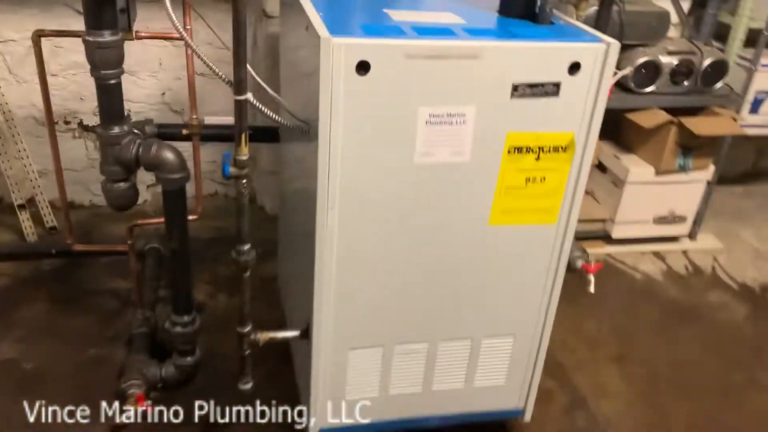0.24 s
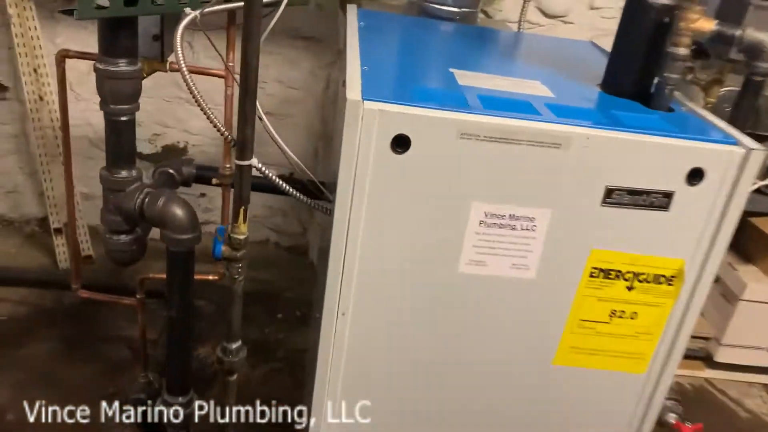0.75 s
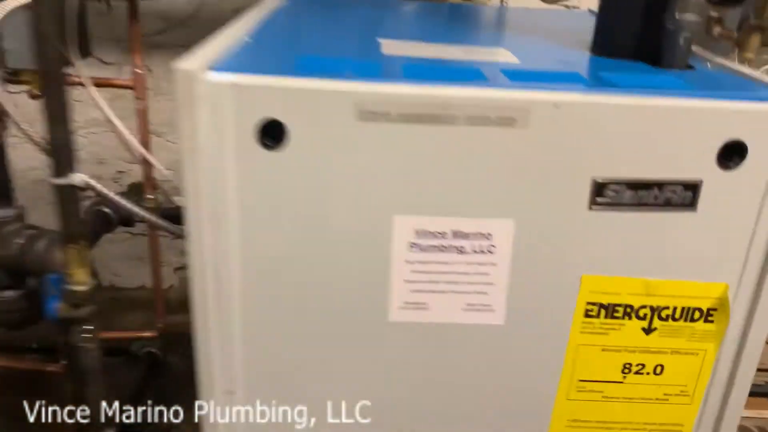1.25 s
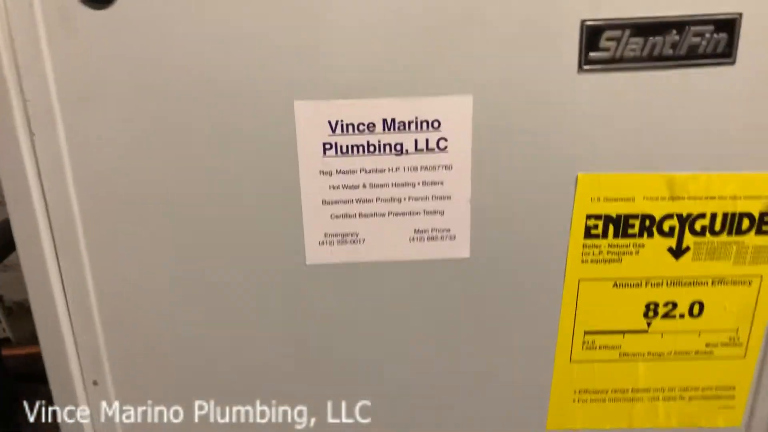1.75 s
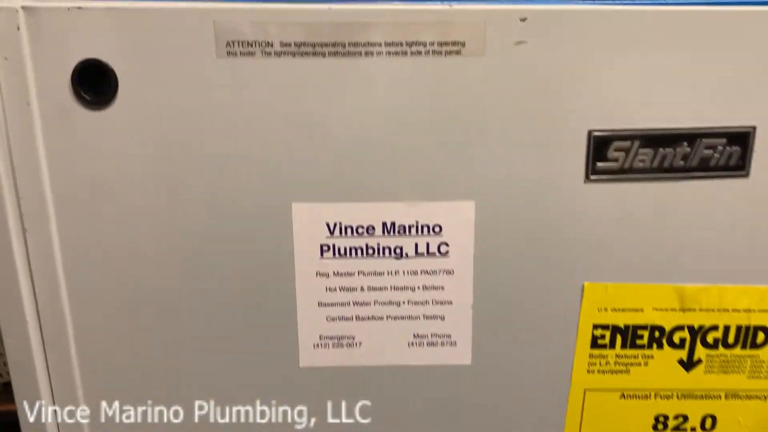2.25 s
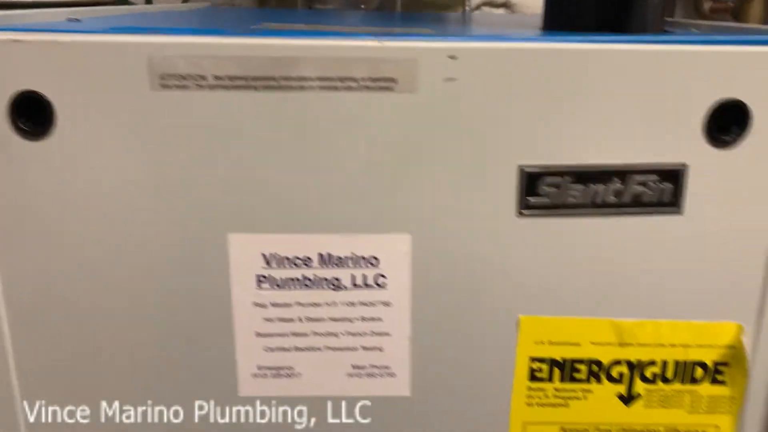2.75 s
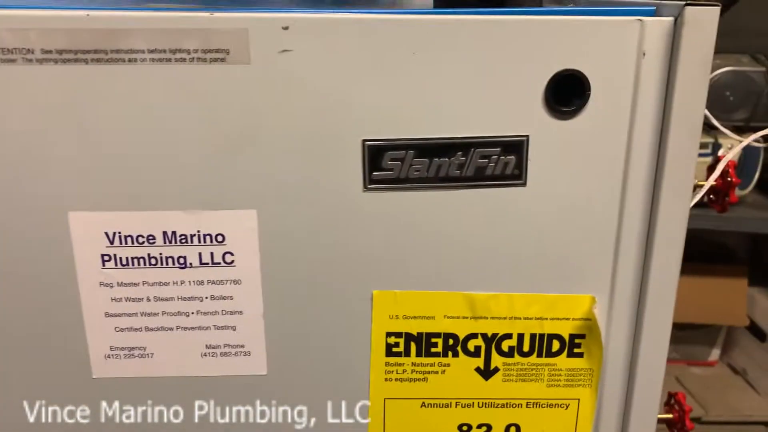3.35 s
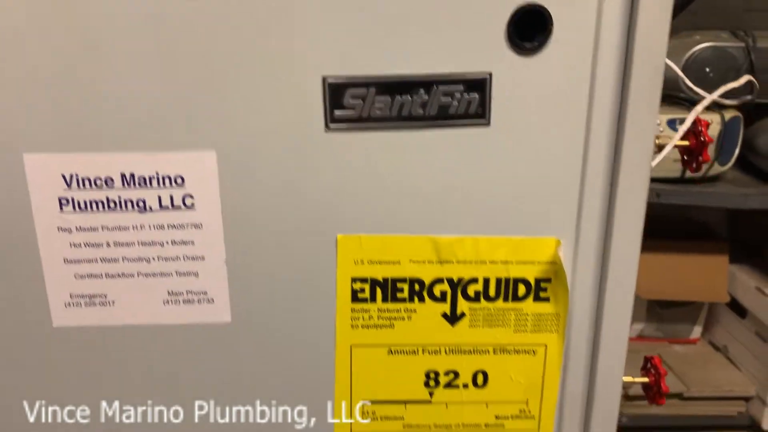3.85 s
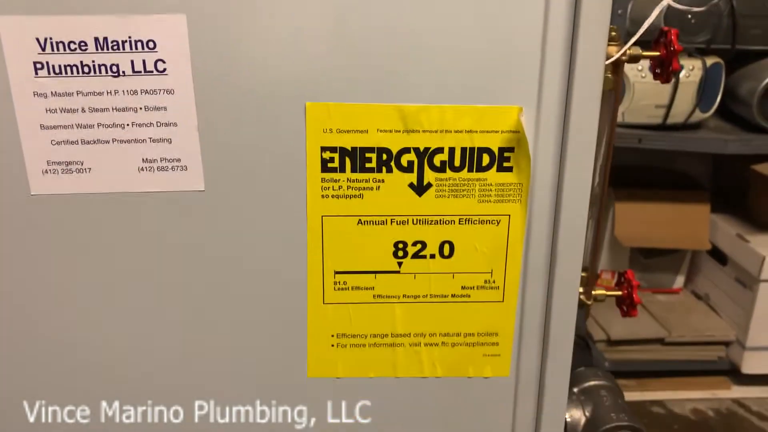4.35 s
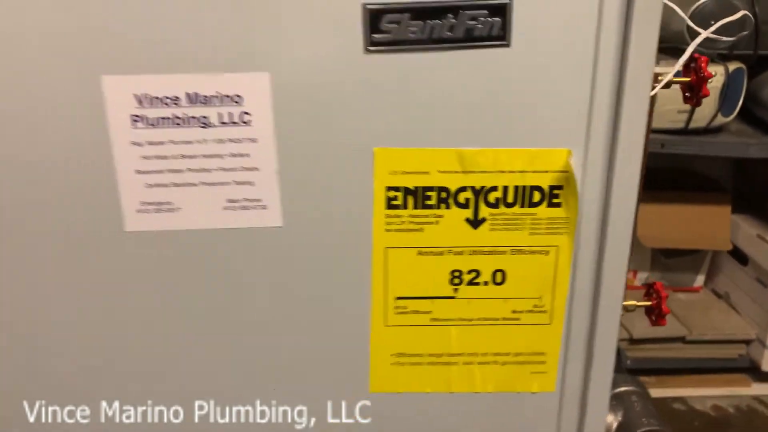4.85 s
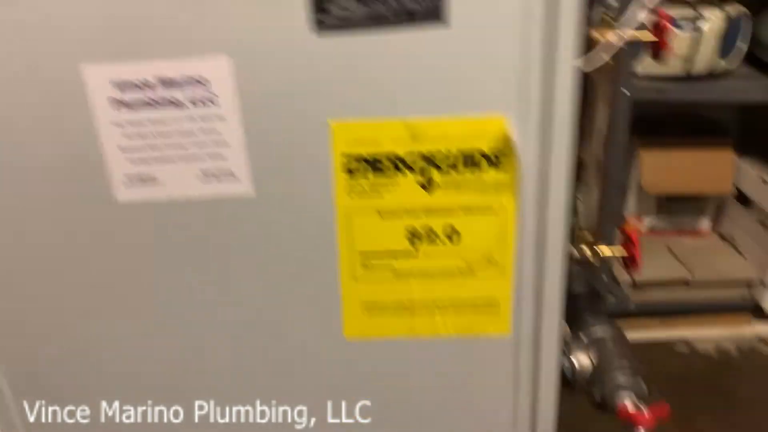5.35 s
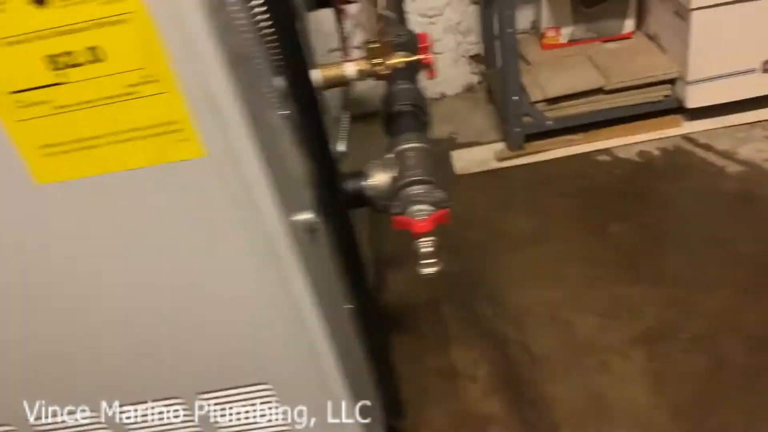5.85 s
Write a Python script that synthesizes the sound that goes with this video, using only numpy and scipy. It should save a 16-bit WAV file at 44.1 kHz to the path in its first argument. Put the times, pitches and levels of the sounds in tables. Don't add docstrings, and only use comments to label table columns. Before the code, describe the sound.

In a concrete basement a gas boiler burns continuously: a deep, slightly wavering rumble, soft low flutters of flame and a fine steady hiss. Close to a handheld stereo microphone someone shifts about, boots creaking in short dry bursts, a soft step scuffing at about one second, and a sharper gritty scuff with a tiny crack after five and a half seconds. Bare walls add a short echo.

```python
import sys
import numpy as np
from scipy import signal
from scipy.fft import rfft, irfft, next_fast_len
from scipy.io import wavfile
from scipy.ndimage import uniform_filter1d

SR = 44100
rng = np.random.default_rng(int(sys.argv[2]) if len(sys.argv) > 2 else 0)


def master_out(mix):
    frames = np.transpose(np.atleast_2d(mix))
    ceiling = np.clip(frames, -1, 1)
    pcm = np.round(ceiling * 32767).astype(np.int16)
    wavfile.write(sys.argv[1], SR, pcm)


def invert_db(level):
    return 10 ** (np.asarray(level, dtype=float) / 20)


N = 268657


def unit(x):
    return x / np.sqrt(np.mean(x ** 2) + 1e-20)


def along(points, hz):
    f, value = np.transpose(points)
    return np.interp(np.log(hz + 1), np.log(f + 1), value)


def curves(rows, t):
    times, *columns = np.transpose(rows)
    return [np.interp(t, times, column) for column in columns]


def filtered(x, response):
    size = next_fast_len(N + SR // 2)
    hz = np.fft.rfftfreq(size, 1 / SR)
    return irfft(rfft(x, size) * response(hz), size)[..., :N]


def modes(table):
    def response(f):
        total = 0
        for k, (centre, width, db) in enumerate(table):
            total = total + (-1) ** k * invert_db(db) * 1j * f * width / (centre ** 2 - f ** 2 + 1j * f * width)
        return total
    return response


# (frequency [Hz], likeness [0..1])
ALIKE = [(150, .995), (280, .88), (600, .5), (1300, .22), (4200, .18), (4900, .6), (7500, .7), (8800, .88),
         (9300, .98), (9900, .98), (10800, .8), (12300, .87), (12700, .995), (14200, .995), (15000, .5)]


def spread(response, gain_db=lambda hz, t: 0, patchy_db=0.):
    hz, t, z = signal.stft(rng.standard_normal((2, N)), SR, nperseg=512)
    patches = uniform_filter1d(rng.standard_normal(z.shape[1:]), size=5, axis=0)
    patches = uniform_filter1d(patches, size=16, axis=1)
    gain = invert_db(patchy_db * unit(patches) + gain_db(hz[:, None], t))
    pair = signal.istft(z * gain, SR, nperseg=512)[1][:, :N]

    def middle_and_side(f):
        turn = np.arccos(np.clip(along(ALIKE, f), 0, 1)) / 2
        return response(f) * [np.cos(turn), np.sin(turn)]
    mid, side = filtered(pair, middle_and_side)
    return unit(np.array([mid + side, mid - side]))


def steadied(x, amount):
    envelope = np.abs(signal.hilbert(x.mean(axis=0), next_fast_len(N))[:N])
    return unit(x * (envelope + 0.16) ** -amount)


# (frequency [Hz], width [Hz], level [dB])
FLAME_MODES = [(61.7, 19.4, -14), (87.9, 17.7, -4.5), (107.2, 10, 0), (126.3, 7.6, -6.5)]
# (frequency [Hz], width [Hz], level [dB])
FLUE_MODES = [(145.7, 16, 3), (159.2, 21.4, -0.5), (196.3, 18, -6), (237.3, 9.8, -7.5),
              (255.5, 17.2, -12.5), (342, 29, -15.5)]
# (frequency [Hz], width [Hz], level [dB])
CHIMNEY_MODE = [(45.5, 22, 0)]
# (frequency [Hz], level per Hz [dB])
DRAUGHT = [(180, -10.5), (300, -1.5), (372, -4.5), (641, -6), (702, -3.5), (734, -6), (1070, -1),
           (1500, -17.5), (1840, -9.5), (4500, -7), (5850, -15), (9900, -120)]
# (time [s], level [dB])
BURN = [(0.0, -33), (0.05, -43.5), (0.8, -51), (1.0, -41.5), (2.22, -44), (2.37, -35.5), (2.44, -42.5),
        (4.99, -40.5), (5.05, -49), (5.15, -35), (5.33, -40), (5.95, -42), (6.02, -44), (6.09, -33)]


def flames(t):
    burn_db = curves(BURN, t)[0]
    mean_db = burn_db.mean()
    deep = invert_db(burn_db) * steadied(spread(modes(FLAME_MODES)), 0.22)
    upper_db = -47.5 + 0.3 * (burn_db - mean_db)
    upper = invert_db(upper_db) * steadied(spread(modes(FLUE_MODES), patchy_db=0.24), 0.12)
    drone = invert_db(-53.5) * spread(lambda f: modes(CHIMNEY_MODE)(f) ** 2)

    def air_db(hz, at):
        follows_db = 0.1 * (curves(BURN, at)[0] - mean_db)
        return (-8.5 + follows_db) * np.clip((hz - 1800) / 1000, 0, 1)
    draught = invert_db(-53.0) * spread(lambda f: invert_db(along(DRAUGHT, f)), air_db, patchy_db=3.0)
    return drone + deep + upper + draught


def puffs():
    puffs_per_s, level_db = 9, -55.5
    blows = (rng.random(N) < puffs_per_s / SR) * invert_db(4.1 * rng.standard_normal(N))
    thump = modes([(135, 110, 0)])
    return invert_db(level_db) * unit(filtered(-blows, lambda f: thump(f) ** 2))


# (frequency [Hz], level per Hz [dB])
JETS = [(2500, -23), (3500, -7), (4600, -3), (5200, 1), (5900, -1), (8000, 1), (9500, 2), (11500, 2.5),
        (13000, -4), (14200, -9.5), (15600, -11), (15900, -120)]
TUBES = [3000, 3450, 3920, 4370, 4895, 5295, 5785, 6270, 6700, 7175, 7750, 8240, 8790, 9200, 9690, 10100,
         10600]
# (time [s], hiss level [dB], crest of the floor echo [Hz])
WALK = [(0, -55, 11800), (.3, -55, 11950), (.7, -54, 11650), (1.0, -53, 12000), (2.0, -53, 11100),
        (2.9, -53.5, 11400), (3.7, -53.5, 11500), (4.3, -52, 11950), (4.6, -52.5, 11600),
        (5.2, -52.5, 11600), (5.4, -52, 12300), (5.62, -50.5, 11600), (6.09, -53, 11800)]


def jets(t):
    def colour(f):
        ripple = np.cos(2 * np.pi * np.interp(f, TUBES, np.arange(len(TUBES))))
        tubes_db = 3.84 * ripple * np.clip((10500 - f) / 3000, .25, 1)
        return invert_db(along(JETS, f) + tubes_db)

    def echo_db(hz, at):
        crest_hz = curves(WALK, at)[1]
        return 2.2 * np.cos(2 * np.pi * 8 * hz / crest_hz) * np.clip((hz - 6500) / 3000, 0, 1)
    return invert_db(curves(WALK, t)[0] + 6.5) * spread(colour, echo_db, patchy_db=1.13)


# (start [s], length [s], slips [count], level [dB], upper over lower mode [dB])
CREAKS = [
    (1.238, 0.11, 9, -41.5, -4),
    (2.938, 0.18, 8, -46.5, -12),
    (4.628, .092, 8, -36, -1),
    (4.884, .1925, 12, -34, 5),
    (5.169, 0.13, 8, -41, -8.5),
]


def creaks():
    quick_gap_s, slowing = .0115, 1.55
    swell_db, peak_late, uneven_db, colour_db = 7, 1.7, 1.2, 2
    slips = []
    for start, length, count, db, bright_db in CREAKS:
        count = round(count)
        waits = slowing ** np.arange(count - 1)
        waits = quick_gap_s + waits / waits.sum() * (length - quick_gap_s * len(waits))
        times = start + np.cumsum([0, *waits])
        luck = rng.standard_normal((count, 2))
        progress = (np.arange(count) + 1) / (count + 1)
        swell = swell_db * (np.sin(np.pi * progress ** peak_late) - 1)
        slips += zip(times, db + swell + uneven_db * luck[:, 0], bright_db + colour_db * luck[:, 1])
    return slips


# (start [s], hold [s], level [dB], upper mode [dB], top mode [dB])
STROKES = [(0, 0.013, -44.5, -4, -4), (0.05, 0.17, -59.5, -16, -3), (0.247, 0.031, -52, -13, -3.5),
           (0.302, 0.17, -54, -6, -8), (0.546, 0.043, -54, 5, -5), (0.595, 0.12, -54, 0, -8),
           (0.783, 0.043, -55.5, -7, -23), (0.996, 0.15, -55.5, -1, -12), (1.228, 0.092, -48, -1.5, -13),
           (1.327, 0.2, -55, -9, -9), (2.213, 0.19, -60.5, 0, -11), (2.745, 0.42, -64.5, 1.5, -1.5),
           (3.379, 0.11, -54, -11, -17), (1.575, .55, -64, -6.5, -8), (3.543, 1, -65.5, -8, -6.5),
           (4.61, 0.16, -58.5, -5, -5.5), (4.88, 0.11, -56, -7, -4), (5.003, 0.17, -56.5, -16, -2.5),
           (5.154, 0.11, -56.5, -7, -10), (5.417, 0.29, -55, -6, -8.5), (5.733, .4, -52, -9, -12)]


def rubbing(t):
    rise_s, t60_s = 0.011, 0.25
    power = np.zeros((3, N))
    for start, hold, db, upper_db, top_db in STROKES:
        rise = np.clip((t - start) / rise_s, 0, 1)
        fall = invert_db(-60 * np.clip(t - start - hold, 0, None) / t60_s)
        power += (invert_db([[db], [db + upper_db], [db + top_db]]) * rise * fall) ** 2
    return np.sqrt(power)


# (time [s], level [dB], upper over lower mode [dB])
SLIPS = [(.005, -35.5, 7), (.26, -36, -7), (.277, -48, -17), (.323, -54, 4), (.394, -44.5, 11),
         (.437, -48, -1), (.557, -42, -4), (1.021, -49, 0), (1.398, -40, 0), (1.432, -36.5, -2),
         (1.478, -33, -0.5), (2.22, -42, 7), (2.313, -38, -5), (2.372, -39, -3), (2.895, -43.5, -6),
         (3.36, -38.5, -12), (3.396, -44, -7), (3.03, -49, -12), (4.353, -43.5, 1), (4.61, -33, -5),
         (4.747, -37.5, -3), (5.146, -35, -12), (5.347, -47.5, 14), (5.389, -52.5, 19), (5.44, -49, 13),
         (5.694, -41, -2), (5.76, -48, -5), (5.841, -40, 2), (6.004, -47, -24), (6.017, -39, -1)]
# (frequency [Hz], width [Hz])
LEATHER = [(620, 250), (1110, 290), (1750, 800)]
# (time [s], pitch [ratio])
BEND = [
    (0, 0.97),
    (.7, 0.98),
    (1.22, 0.88),
    (1.34, 0.9),
    (1.42, 0.98),
    (3.2, 1.105),
    (3.36, 1.17),
    (3.6, 0.95),
    (4.9, 1.005),
    (6.09, 0.93),
]


def leather(t):
    out = np.zeros(N + 2048)
    grid = np.fft.rfftfreq(2048, 1 / SR)
    for s, db, bright_db in SLIPS + creaks():
        bend = curves(BEND, s)[0]
        kicks = invert_db([db - bright_db / 2 + 36.5, db + bright_db / 2 + 37.5, db + bright_db / 2 + 14])
        spectrum = 0
        for kick, (hz, width), lag_s in zip(kicks, LEATHER, [.002, 0, 0]):
            mode = modes([(bend * hz, 1.15 * width, 0)])(grid)
            spectrum = spectrum + kick * mode ** 3 * np.exp(-2j * np.pi * grid * lag_s)
        ring = irfft(spectrum)
        out[round(s * SR):][:len(ring)] += ring
    out = out[:N]

    slack, taut = .85, 1.15
    tautness = np.clip((curves(BEND, t)[0] - slack) / (taut - slack), 0, 1)
    for (hz, width), rub, share in zip(LEATHER, rubbing(t), invert_db([-0.5, 0.9, 3.5])):
        crowd = (rng.random(N) < 650 / SR) * invert_db(4.8 * rng.standard_normal(N))
        crowd = crowd * rng.choice([-1, 1], N)
        loose, tight = [filtered(crowd, lambda f: modes([(ratio * hz, 1.2 * width, 0)])(f) ** 2)
                        for ratio in (slack, taut)]
        out += share * rub * unit(np.sqrt(1 - tautness) * loose + np.sqrt(tautness) * tight)
    return out


# (start [s], rise [s], t60 [s], level [dB], centre [Hz])
SCUFFS = [
    (0, 0.059, 0.22, -51, 6640),
    (1.005, 0.01, 0.12, -53, 2190),
    (1.084, 0.018, 0.16, -44.5, 1590),
    (1.094, 0.016, 0.18, -44.5, 5160),
    (5.54, 0.025, 0.14, -48, 4670),
    (5.61, 0.0091, 0.079, -43.5, 5230),
    (5.745, 0.017, .2, -50, 9000),
]


def soles(t):
    out = np.zeros(N)
    for start, rise, t60, db, hz in SCUFFS:
        since = np.clip(t - start, 0, None)
        stroke = np.where(since < rise, (since / rise) ** 1.4, invert_db(-60 * (since - rise) / t60))
        grit = rng.standard_normal(N) * invert_db(0.7 * rng.standard_normal(N))
        out += invert_db(db) * stroke * unit(filtered(grit, lambda f: modes([(hz, 1.25 * hz, 0)])(f) ** 2))
    return out


# (time [s], peak level [dB], frequency [Hz])
GRIT = [
    (4.468, -37, 7280),
    (5.551, -40, 6100),
    (5.567, -54, 7080),
    (5.58, -46, 6270),
    (5.6226, -29, 5930),
    (5.7633, -53, 5900),
]


def snaps():
    out = np.zeros(N)
    u = np.arange(SR // 100) / SR
    for s, db, hz in GRIT:
        tick = invert_db(-60 * u / .0012) * np.sin(2 * np.pi * hz * u)
        noise = np.pad(rng.standard_normal(len(u)), (0, N - len(u)))
        ring = .3 * invert_db(-60 * u / .008) * filtered(noise, modes([(hz, hz, 0)]))[:len(u)]
        out[round(s * SR):][:len(u)] += invert_db(db + 7) * (tick + ring)
    return out


# (frequency [Hz], t60 [s])
CELLAR = [(200, 0.66), (1000, 0.21), (4000, 0.21), (7500, 0.14), (9000, 0.015), (12000, 0.0069)]


def cellar(x):
    hz, t, z = signal.stft(rng.standard_normal((2, SR // 2)), SR, nperseg=256)
    decay = invert_db(-60 * t / along(CELLAR, hz)[:, None])
    tail = signal.istft(z * decay, SR, nperseg=256)[1]
    delayed = np.pad(x, (150, 0))[None]
    return signal.fftconvolve(delayed, tail / np.linalg.norm(tail[0]), axes=1)[:, :N]


def scene():
    t = np.arange(N) / SR
    creak = leather(t)
    scuff = soles(t)
    creak = creak + snaps()
    creak = creak + invert_db(-7.5) * cellar(creak)
    scuff = 0.74 * scuff + invert_db(4.0) * cellar(scuff)
    return flames(t) + puffs() + jets(t) + creak + scuff


# (frequency [Hz], lead [rad])
LEAD = [(0, 0), (250, .1), (600, .5), (1500, .7), (1900, -1.9), (3300, .7), (4400, 3.7), (5100, 4.3),
        (5600, 6.28), (6200, 6.9), (7500, 7.6), (9000, 9.15), (9950, 9.65), (12400, 12), (12800, 12.57),
        (14300, 12.57), (15300, 15.4)]
# (frequency [Hz], level [dB])
LEFT_DB = [(50, 6), (90, -3.5), (250, -1), (600, 0), (3500, -0.5), (5000, 3), (7000, 0), (15000, 0.5)]
# (time [s], extra lead [microseconds])
TILT = [
    (0, -3),
    (1.2, -6),
    (1.6, -8),
    (2.4, -6),
    (2.7, 1.5),
    (5.2, 1.5),
    (5.45, -5),
    (6.09, -4),
]


def two_ports(dry):
    half = np.array([[.5], [-.5]])

    def ports(f):
        bass_cut = (f / 38) ** 4 / (1 + (f / 38) ** 4)
        lead = np.exp(1j * half * np.interp(f, *np.transpose(LEAD)))
        return lead * invert_db(half * along(LEFT_DB, f)) * bass_cut
    heard = filtered(dry, ports)
    slope = filtered(heard, lambda f: 2j * np.pi * f)
    return heard + half * 1e-6 * curves(TILT, np.arange(N) / SR)[0] * slope


def roll_off(x):
    return signal.sosfilt(signal.butter(12, 15630, fs=SR, output="sos"), x)


def record(dry):
    mix = two_ports(dry)
    return roll_off(mix)


dry = scene()
out = record(dry)
master_out(out)
```